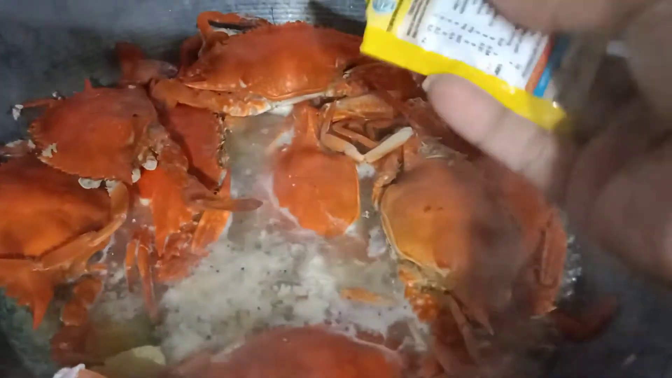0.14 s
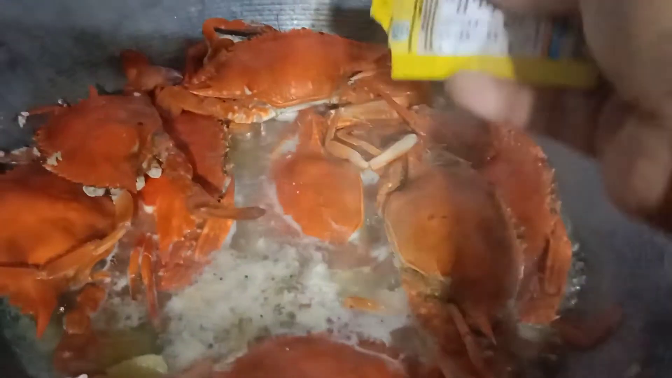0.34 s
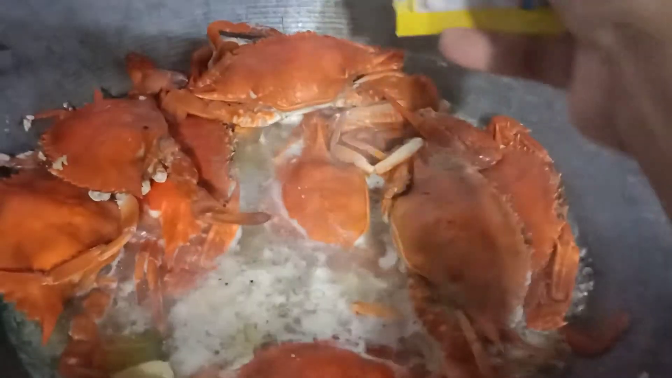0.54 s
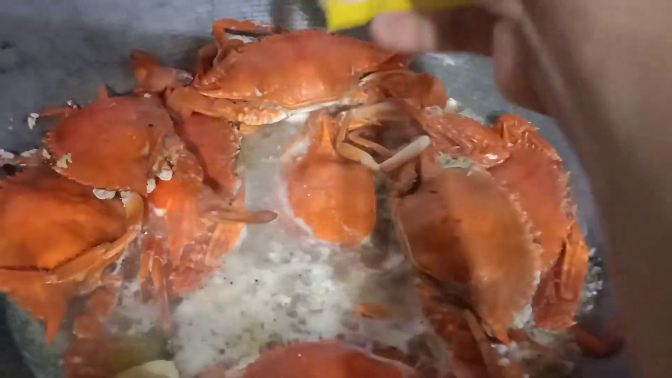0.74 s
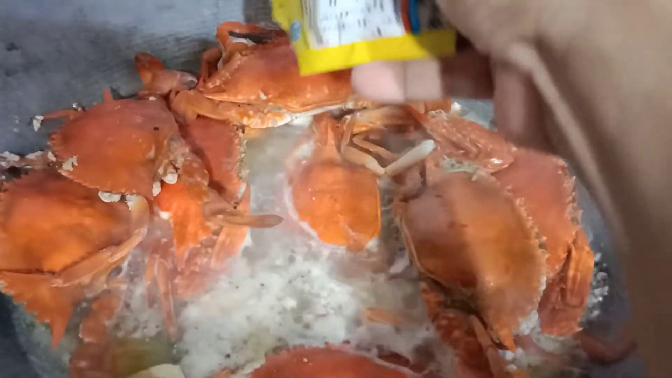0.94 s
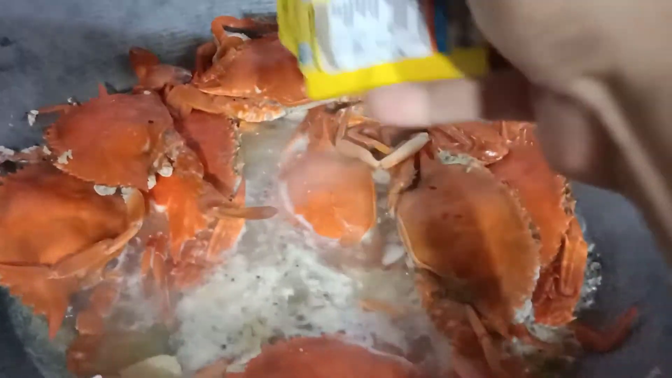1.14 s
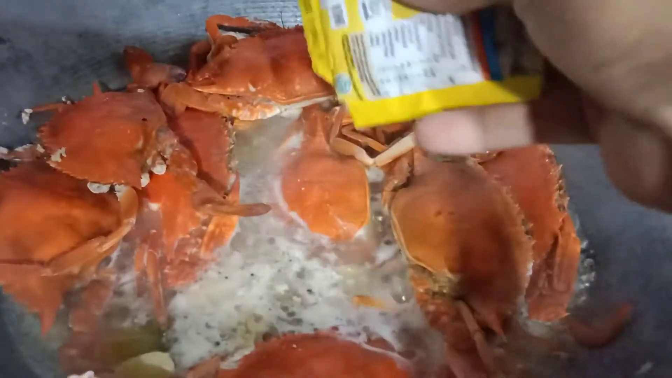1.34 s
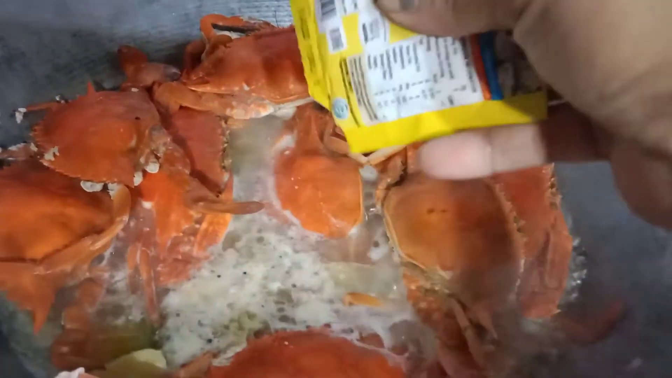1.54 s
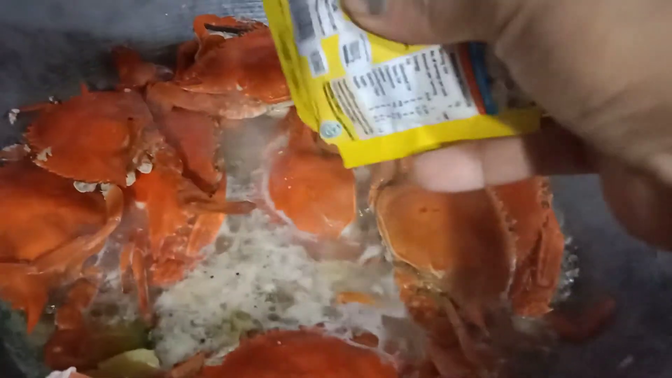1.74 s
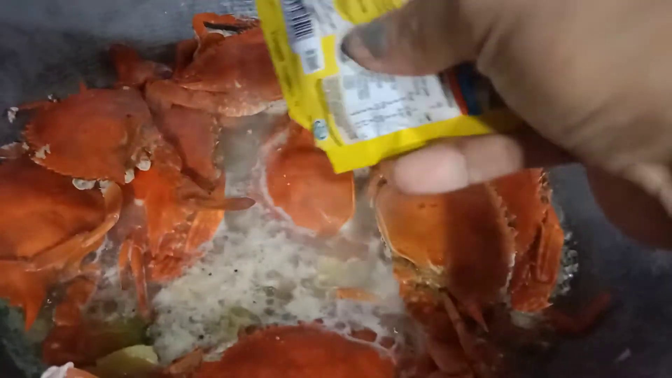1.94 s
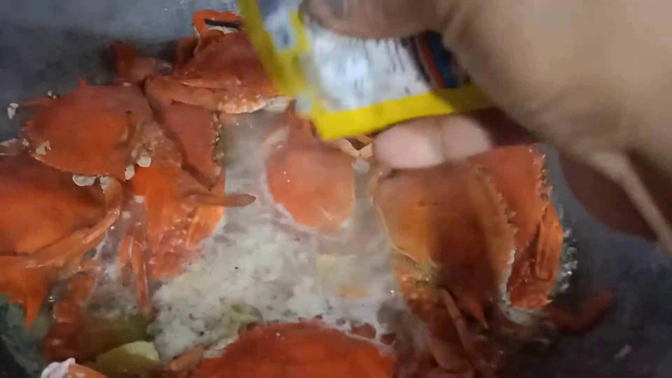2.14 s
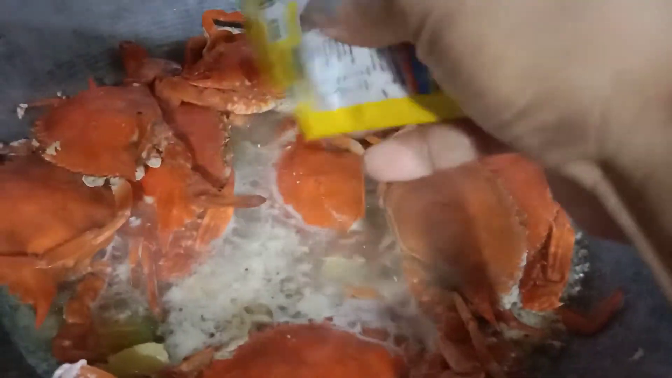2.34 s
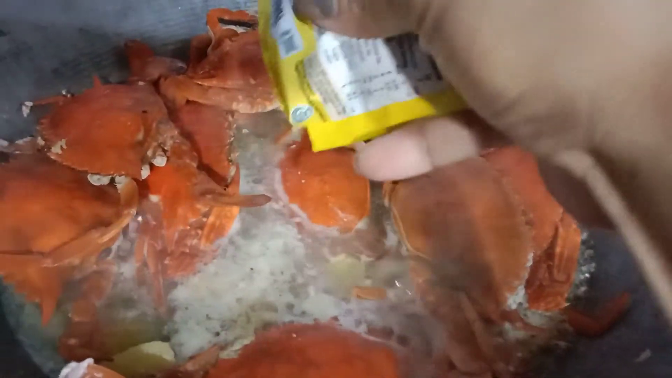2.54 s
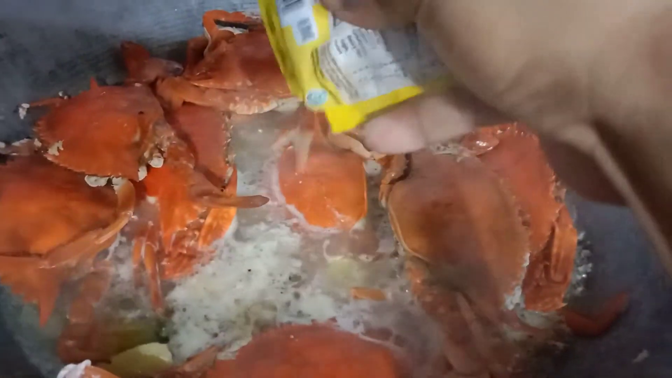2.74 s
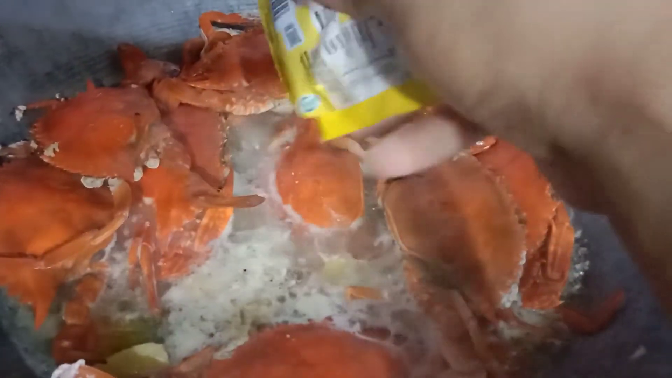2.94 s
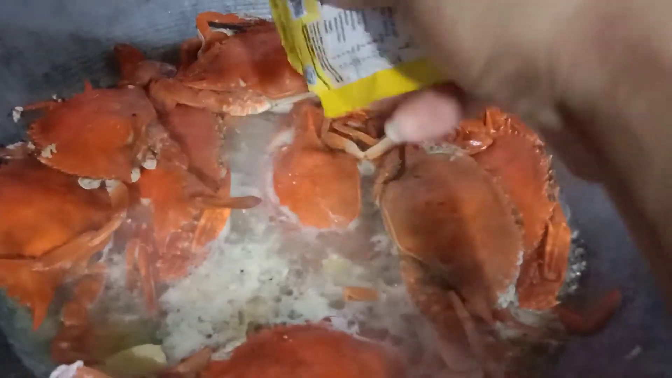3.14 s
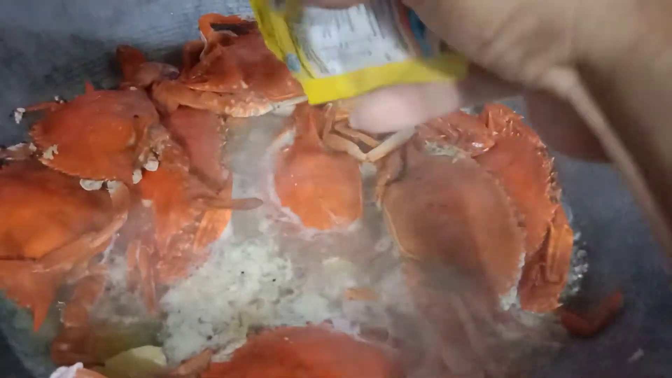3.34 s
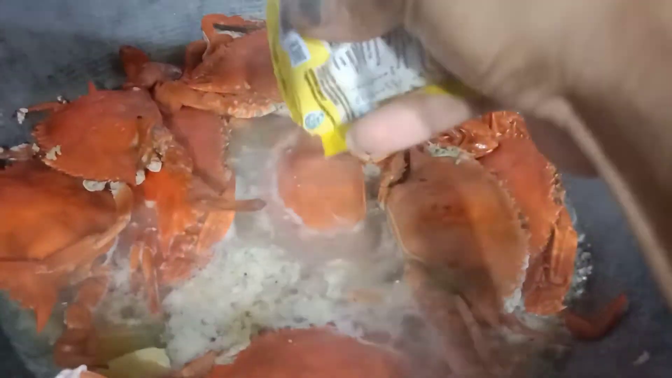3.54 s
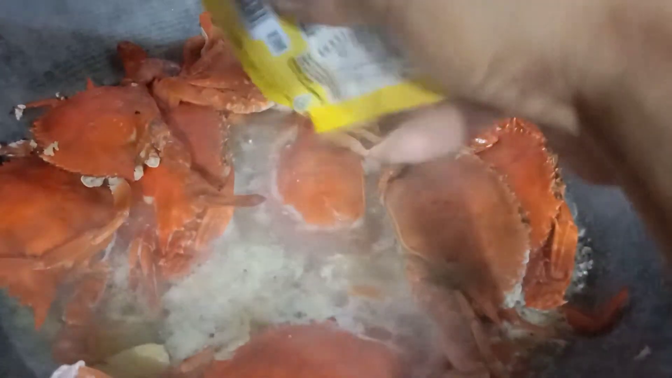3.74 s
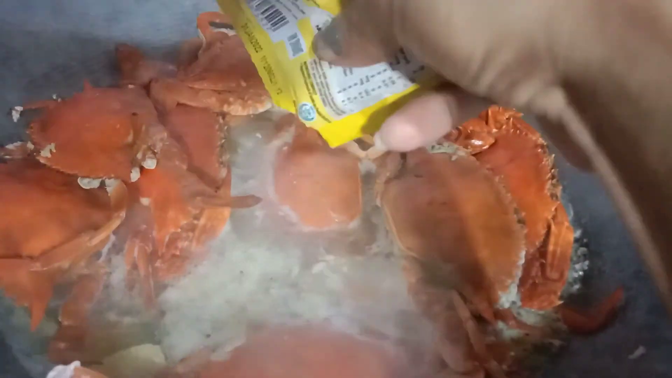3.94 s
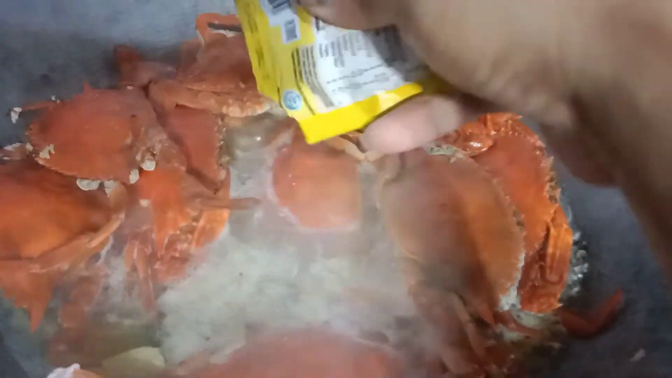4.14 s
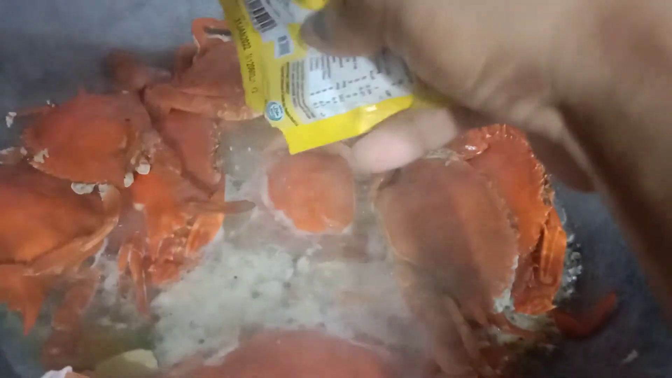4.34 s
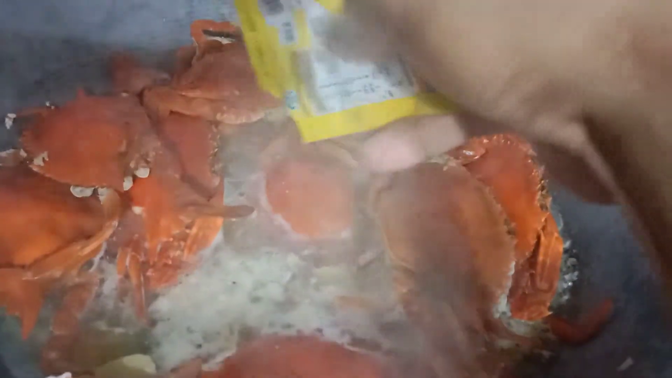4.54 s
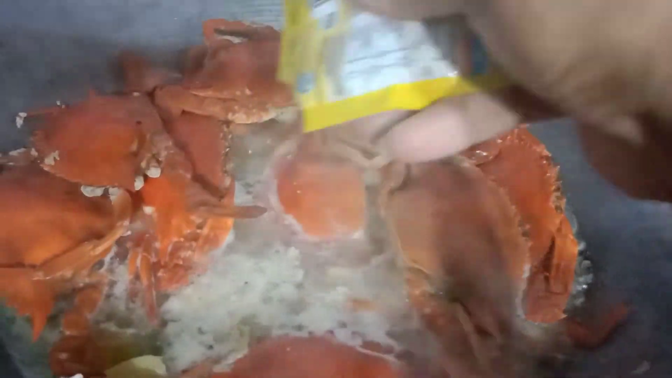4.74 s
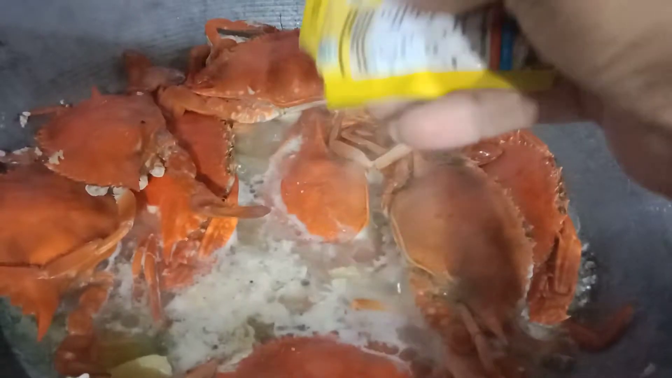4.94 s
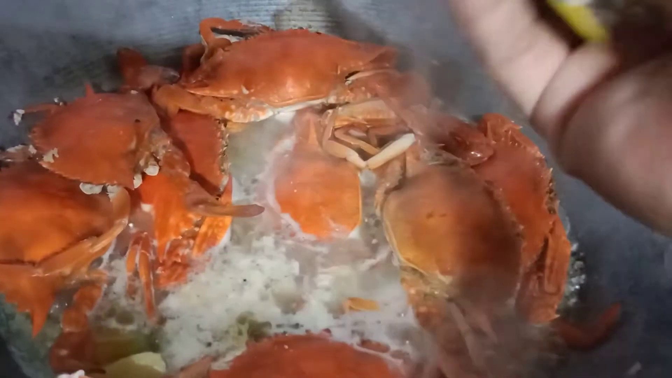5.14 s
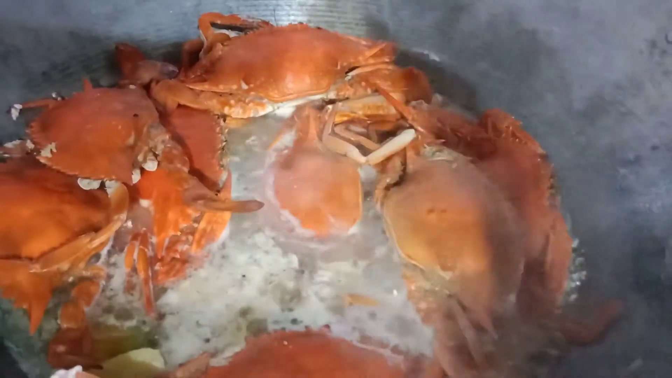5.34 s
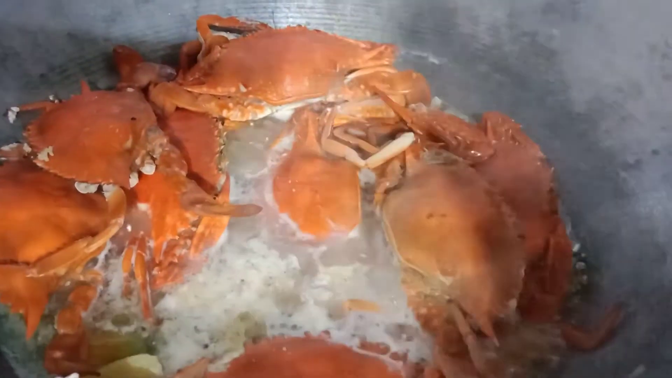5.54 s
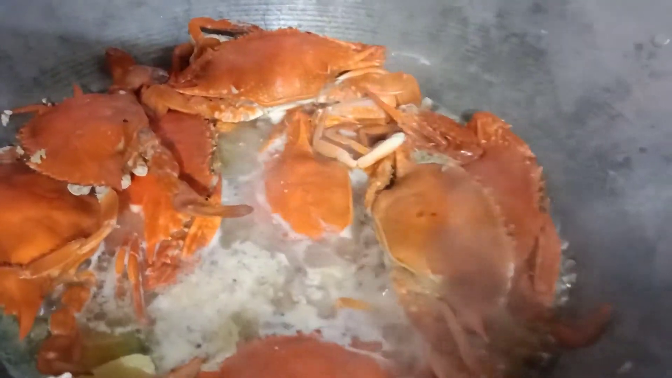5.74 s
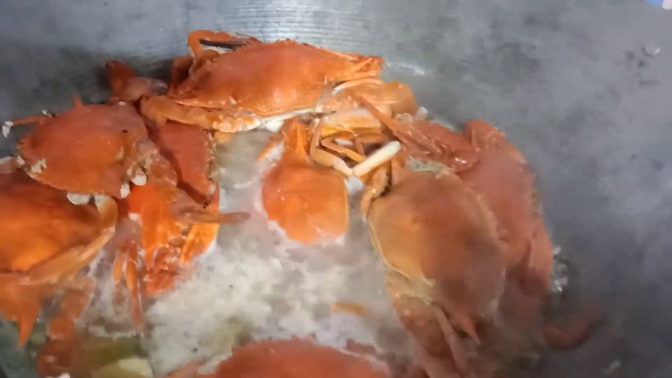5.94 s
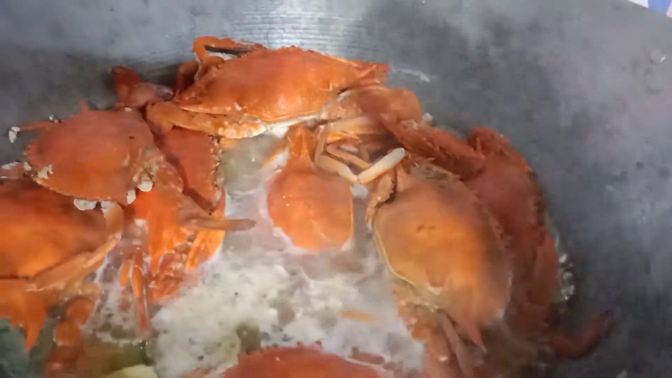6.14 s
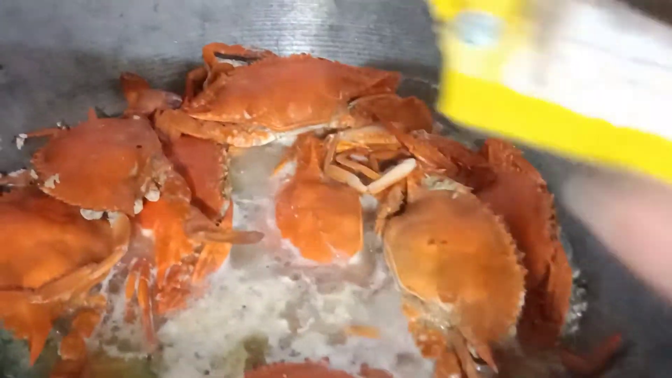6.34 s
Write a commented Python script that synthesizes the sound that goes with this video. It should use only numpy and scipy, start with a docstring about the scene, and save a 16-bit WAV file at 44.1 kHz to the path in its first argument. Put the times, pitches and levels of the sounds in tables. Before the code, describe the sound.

In a kitchen, broth bubbles and sizzles quietly in a wok, with occasional small plops, a wavering burner hum and a very faint high steam whistle. Close up and much louder, a thin plastic sachet is shaken and squeezed, crackling in uneven clusters of bright snaps. Near the end the handling stops, apart from one short crinkle, leaving the gentle simmer.

```python
"""A small plastic sachet rustles over a simmering wok as a hand squeezes and shakes it.
Broth bubbles ring the wok and burst singly over burner hum, sizzle and a faint steam whistle.
The film buckles in snaps, short clusters of creases; the kitchen rings on briefly.
The recorder suppresses noise, so hum and low bubbling come and go; it shuts its treble when quiet."""
import sys
import numpy as np
from scipy import signal
from scipy.fft import rfft, irfft
from scipy.io import wavfile
from scipy.ndimage import uniform_filter1d

SR = 44100
rng = np.random.default_rng(int(sys.argv[2]) if len(sys.argv) > 2 else 0)


def persist_wave(psi):
    """Save psi, clipped to +-1, as 16-bit WAV."""
    counts = np.round(np.clip(psi, -1, 1) * 32767).astype(np.int16)
    wavfile.write(sys.argv[1], SR, np.atleast_2d(counts).T)


N = 286650


def from_db(db):
    return 10 ** (np.asarray(db) / 20)


def unit_rms(x):
    return x / np.sqrt(np.mean(x ** 2) + 1e-20)


def per_sample(curve):
    """Rows of (t/s, value), interpolated to N samples."""
    return np.interp(np.arange(N) / SR, *np.transpose(curve))


def at_hz(curve, hz):
    """Rows of (f/Hz, value), read on a log-frequency axis."""
    knots_hz, values = np.transpose(curve)
    return np.interp(np.log(np.maximum(hz, 1)), np.log(knots_hz), values)


def bandpass(x, low_hz, high_hz):
    return signal.sosfilt(signal.butter(2, [low_hz, high_hz], "band", fs=SR, output="sos"), x)


def lowpass(x, hz):
    """Zero phase, so differences give bands that sum without gaps."""
    return signal.sosfiltfilt(signal.butter(2, hz, fs=SR, output="sos"), x)


def drift(rate_hz):
    """Slow random curve; rms 1."""
    hop, settle = 40, 2000
    pole = np.exp(-2 * np.pi * rate_hz * hop / SR)
    noise = rng.standard_normal(N // hop + settle + 2)
    slow = signal.lfilter([1], [1, -2 * pole, pole * pole], noise)[settle:]
    return np.interp(np.arange(N) / hop, np.arange(len(slow)), unit_rms(slow))


def coloured(x, spectrum, size=4096):
    """Minimum-phase filter from rows of (f/Hz, level/dB); white noise keeps its rms."""
    gain = from_db(at_hz(spectrum, np.fft.rfftfreq(size, 1 / SR)))
    cepstrum = irfft(np.log(gain))
    cepstrum[1:size // 2] *= 2
    cepstrum[size // 2 + 1:] = 0
    response = irfft(np.exp(rfft(cepstrum)))
    return signal.fftconvolve(x, response / np.sqrt(np.sum(response ** 2)))[:N]


def clicks(per_s, spread_db):
    """Random impulses of uneven size; rms 1."""
    sizes = from_db(spread_db * np.minimum(rng.exponential(1, N), 4)) * rng.choice([-1, 1], N)
    return unit_rms(sizes * (rng.random(N) < per_s / SR))


def resonate(x, hz, width_hz):
    """Two-pole resonance; rms 1."""
    r = np.exp(-np.pi * width_hz / SR)
    return unit_rms(signal.lfilter([1, 0, -1], [1, -2 * r * np.cos(2 * np.pi * hz / SR), r * r], x))


def squeeze_db():
    """Rustle level: each squeeze of the hand rises, holds and relaxes; the strongest counts."""
    # squeezes: t/s, hold/s, level/dB
    squeezes = [(-.03, 0.029, -47.5), (.21, 0.024, -61.5), (.39, .05, -55.5), (.53, 0.049, -60.5),
                (.61, 0.074, -48), (.75, 0.07, -47), (1.0, 0.1, -58), (1.19, 0.2, -52), (1.45, 0.12, -54.5),
                (1.56, 0.26, -55), (1.85, 0.028, -51.5), (1.93, 0.45, -50), (2.34, 0.21, -44),
                (2.7, 0.36, -49.5), (3.09, 0.13, -50), (3.241, 0.047, -45.5), (3.39, 0.17, -44.5),
                (3.7, 0.44, -49), (4.11, 0.094, -50.5), (4.28, .06, -57), (4.38, 0.01, -50.5),
                (4.49, 0.021, -44.5), (4.66, 0.077, -46), (4.85, 0.078, -44.5), (5.04, 0.11, -52.5),
                (5.85, 0.02, -52), (5.99, 0.071, -54.5), (6.46, .1, -58.5)]
    grip_db_per_s, relax_db_per_s = 499.5, 201
    t = np.arange(0, N + 40, 40) / SR
    start_s, hold_s, held_db = np.transpose(squeezes)[..., None]
    grip_db = grip_db_per_s * np.maximum(start_s - t, 0)
    relax_db = relax_db_per_s * np.maximum(t - start_s - hold_s, 0)
    return np.interp(np.arange(N) / SR, t, (held_db - grip_db - relax_db).max(axis=0))


def rustle(level_db):
    """Tiny creases buckle in clumps; air pockets pop hollowly."""
    clumps = from_db(3.5 * drift(rate_hz=35))
    creases = lowpass(clicks(per_s=3000, spread_db=0), hz=10000)
    thin = unit_rms(clumps * (creases - 0.5 * lowpass(creases, hz=1400)))  # small creases: little bass
    pockets = sum(resonate(clicks(per_s=6, spread_db=2), hz, width_hz=0.07 * hz)
                  for hz in np.geomspace(280, 1500, 9))
    return from_db(level_db) * (thin + from_db(-5) * unit_rms(pockets))


def small_snap_rows(rustle_db, count=600):
    """Rows for film_snaps: lesser snaps at random times, following the rustle level."""
    rate_per_s, above_rustle_db, body_db = 55, 17, -14.5
    wait, weakness, edge = rng.random((count, 3)).T
    times_s = np.cumsum(-np.log(1 - wait)) / rate_per_s
    levels_db = np.interp(times_s, np.arange(N) / SR, rustle_db) + above_rustle_db - 11 * weakness
    return [(start_s, level_db, body_db, bright_db)
            for start_s, level_db, bright_db in zip(times_s, levels_db, 12 * (edge - 0.5))
            if start_s < N / SR]


def burner_hum():
    """Low burner hum, heard in surges; the envelope stands for the noise suppressor opening and closing."""
    # hum envelope: t/s, level/dB
    envelope = [(0.0, -81), (0.05, -72), (0.61, -82.5), (0.65, -64), (1.92, -77), (1.96, -67),
                (2.23, -54.5), (2.3, -80), (2.46, -57), (2.77, -80.5), (2.9, -59.5), (3.13, -89.5),
                (3.24, -59), (3.76, -78), (4.0, -59.5), (4.04, -77), (4.56, -68), (5.76, -78.5),
                (5.88, -62.5), (5.97, -83), (6.35, -70), (6.5, -92)]
    hum_hz, width_hz = 122, 29
    rumble = resonate(rng.standard_normal(N), hum_hz, width_hz)
    return from_db(per_sample(envelope)) * (resonate(rumble, hum_hz, width_hz) + 0.35 * rumble)


def bubbling():
    """Broth rings two wok resonances; the low one comes and goes as the suppressor lets it through."""
    # low bubbling as let through: t/s, level/dB
    envelope = [(0.0, -64), (0.23, -79.5), (0.87, -52), (1.48, -75), (1.65, -52), (1.74, -75.5),
                (2.08, -91), (2.19, -53.5), (3.44, -75), (3.49, -48), (3.58, -85), (3.96, -52.5),
                (3.98, -69.5), (5.1, -59), (5.59, -73), (5.74, -68), (5.97, -78.5), (6.5, -67)]
    low_hz, low_width_hz = 527, 32
    heard_db = per_sample(envelope)
    low_db = heard_db + 5.5 * drift(rate_hz=3.4)
    low_ring = resonate(clicks(per_s=890, spread_db=0.5), low_hz, low_width_hz)
    low_ring = resonate(low_ring, low_hz, low_width_hz)
    high_db = -58 + 0.55 * (heard_db - heard_db.mean()) + 2.5 * drift(rate_hz=3.3)
    high_ring = resonate(clicks(per_s=2200, spread_db=-1.5), hz=1400, width_hz=110)
    return from_db(low_db) * low_ring + from_db(high_db) * high_ring


def sizzle(level_db=-59):
    """Dense clicks from the wok; low bands come and go, the high hiss is steadier."""
    # sizzle spectrum: f/Hz, density/dB
    spectrum = [(29, -70.5), (50, -31), (122, -13), (468, -20), (524, -17), (701, -23), (838, -20),
                (1640, -24), (2010, -21.5), (2930, -15), (4390, -30.5), (6140, -11.5), (7050, -28.5),
                (7700, -16), (9300, -17), (10500, -25), (13600, -65), (22000, -120)]
    crackle = coloured(clicks(per_s=8000, spread_db=2.5), spectrum)
    edges_hz = np.geomspace(40, 14000, 15)
    common_db = 3.5 * drift(rate_hz=44)
    patches = np.zeros(N)
    for low_hz, high_hz in zip(edges_hz, edges_hz[1:]):
        swing_db = (common_db + 1.83 * drift(rate_hz=7)) / (1 + low_hz / 3000)
        patches += bandpass(crackle, low_hz, high_hz) * from_db(swing_db)
    return from_db(level_db) * unit_rms(patches)


def steam_whistle():
    """Steam sounds a faint, narrow noise band of wavering level."""
    level_db = -65 + 3 * drift(rate_hz=2.8)
    return from_db(level_db) * resonate(rng.standard_normal(N), hz=6160, width_hz=120)


def plops():
    """A bursting bubble swells within a few cycles and rings down, rising slightly in pitch."""
    # single bubbles: t/s, level/dB, f/Hz, t60/s
    bubbles = [(0.079, -41.5, 1780, 0.028), (0.341, -32.5, 1400, 0.031), (0.489, -52.5, 497, 0.085),
               (0.76, -50, 1390, 0.067), (0.841, -39.5, 533, 0.049), (0.959, -31, 236, 0.028),
               (1.28, -30, 832, 0.027), (1.649, -43, 1455, 0.14), (2.076, -31, 750, 0.035),
               (2.169, -28.5, 735, 0.036), (2.239, -38.5, 535, 0.036), (2.44, -30.5, 1450, 0.071),
               (2.688, -51, 1400, 0.034), (3.105, -23.5, 1293, 0.021), (3.487, -32.5, 1296, 0.044),
               (3.958, -24.5, 1320, 0.049), (4.369, -29.5, 1396, 0.033), (4.51, -21.5, 1373, 0.019),
               (5.069, -37, 850, 0.08), (5.377, -49, 1420, 0.085), (5.499, -51, 866, 0.05),
               (5.584, -35.5, 1692, 0.024), (5.743, -46.5, 520, 0.07), (6.313, -46, 1360, 0.068),
               (6.465, -46, 937, 0.063)]
    t = np.arange(8000) / SR
    out = np.zeros(N + len(t))
    for start_s, level_db, hz, t60_s in bubbles:
        ring = np.sin(2 * np.pi * hz * (t + 0.71 * t ** 2))
        attack = 1 - np.exp(-t * hz / 1.2)
        out[round(start_s * SR):][:len(t)] += from_db(level_db - 60 * t / t60_s) * attack * ring
    return out[:N]


def film_snaps(small_rows):
    """Each snap is a cluster of creases buckling within a few ms, with its own body and brightness."""
    # distinct snaps: t/s, level/dB, body below 2.2 kHz re level/dB, brightness/dB
    snap_rows = [(0.3922, -23.5, -20.5, -3), (0.5463, -35.5, -19, -6), (0.601, -32, -18, -9),
                 (0.623, -29, -21, -6), (0.642, -22.5, -15, 8), (0.6553, -20, -30, -9.5),
                 (0.7392, -10.5, -8, -0.5), (0.825, -16.5, 1.5, -3), (0.842, -16.5, -6.5, -2),
                 (0.8992, -17.5, -7, -1), (0.92, -14, -12, -3.5), (0.9905, -25.5, -32, -11),
                 (1.017, -10.5, -10, -3.5), (1.077, -29.5, -23, -8), (1.1647, -18, -12, 0),
                 (1.2357, -20, -12, -4), (1.2674, -24, 9, 7), (1.2823, -15, -8, -3),
                 (1.332, -21.5, -14.5, -4), (1.3563, -30.5, -2.5, -6.5), (1.385, -32, -9.5, 1.5),
                 (1.4894, -34, -7, -4), (1.5642, -22.5, -10, 2.5), (1.5737, -21, -10, 3.5),
                 (1.6345, -34, -20, 0), (1.6517, -21, -13, 1), (1.6646, -16.5, 4, -1.5),
                 (1.6843, -24.5, -6, 11), (1.6971, -22, -7, -14), (1.7556, -11.5, -6, -3),
                 (1.917, -14.5, -5.5, 0.5), (1.9353, -12.5, -9.5, -0.5), (1.9565, -25, -18, -5),
                 (1.9641, -11, -3, -0.5), (2.0283, -17.5, -35, 6), (2.0778, -18.5, -17, 0),
                 (2.1254, -38, -15, -17), (2.1354, -13.5, -41, -3.5), (2.1711, -16.5, -18.5, -3.5),
                 (2.225, -20.5, 3, -2.5), (2.2444, -30.5, -18, -0.5), (2.267, -26.5, -9, 5),
                 (2.3367, -14.5, -15, -2), (2.357, -19, -15, -2), (2.367, -16, -16, -1.5),
                 (2.4064, -15.5, 6.5, -0.5), (2.4221, -11.5, -9.5, -5.5), (2.4338, -15.5, -7, -3),
                 (2.4626, -9.5, -9.5, -1.5), (2.4917, -15, -4, -6.5), (2.5063, -5, -11.5, 6.5),
                 (2.5127, -8, -1, -2.5), (2.547, -17, -19, -2), (2.598, -15.5, -14, 3),
                 (2.6694, -20.5, -25, 0), (2.6762, -11, -5, 7.5), (2.6921, -2.5, -13, 2.5),
                 (2.7939, -22.5, -29, 0), (2.807, -19.5, -12, -8), (2.864, -21, -27.5, -5.5),
                 (2.8939, -12, -26, 13), (2.9308, -10, -23.5, 9), (2.9488, -11.5, -24.5, -2.5),
                 (3.0088, -10.5, -13.5, 3.5), (3.0757, -11, -13.5, 5.5), (3.1087, -9.5, -16, -2),
                 (3.1607, -26, -24, 3), (3.1884, -28, -15, -2), (3.2156, -29, -15, -2),
                 (3.238, -28.5, -15, -2), (3.248, -14.5, -24, 1), (3.2597, -13, -13, 3),
                 (3.2814, -16.5, -9, 4), (3.3702, -24, 1.5, -2), (3.3922, -12.5, -34, 4),
                 (3.4301, -14, -4.5, -6.5), (3.446, -17.5, -14, -9.5), (3.463, -12, -1, 7.5),
                 (3.5249, -5.5, -13.5, 6), (3.5947, -15, -15, 1.5), (3.677, -28.5, -11.5, 3.5),
                 (3.7005, -22, -51, -1.5), (3.7274, -11.5, -20.5, 0), (3.7382, -17.5, -18, -1),
                 (3.7563, -18, -17.5, -6), (3.7774, -10.5, -10.5, -4), (3.7858, -7, -11, 3.5),
                 (3.802, -5.5, -16, 2), (3.8414, -14.5, -29, 3), (3.8548, -7.5, -26, 2.5),
                 (3.8902, -13, -11, -1), (3.902, -7, -10, 6.5), (3.9464, -9, -6, 4), (3.9593, -1, -7.5, 2),
                 (3.9834, -13, -15, 1), (3.9944, -12, -15, -1.5), (4.0355, -8.5, -9.5, 0.5),
                 (4.094, -28, -23.5, -4), (4.1024, -11, -12, 3), (4.1061, -5.5, -15.5, 0),
                 (4.2915, -27.5, -11, 2.5), (4.3731, -21.5, -3, -3), (4.393, -28.5, -20, -0.5),
                 (4.472, -20, -13, -5), (4.4901, -15, -4, 1), (4.558, -34, -13.5, 2.5),
                 (4.637, -32, -6.5, 1), (4.663, -16.5, -20.5, -7), (4.6845, -17, -26, 5),
                 (4.722, -27, -13, 6), (4.7526, -18.5, -3, 5), (4.8224, -23, -27, 2),
                 (4.8461, -6.5, -7.5, 3.5), (4.9418, -25.5, 1, -10.5), (4.9658, -22, -0.5, 6),
                 (5.0197, -21.5, -18, -3.5), (5.0387, -17.5, -2, -1), (5.0559, -7.5, -0.5, 4),
                 (5.2938, -36, -18, 0), (5.8505, -27, -2.5, -8), (5.9732, -23.5, -23.5, -9.5),
                 (5.9797, -14, -28, 1), (6.013, -26.5, -20, 1)]
    attack_s, cluster_t60_s, edge_t60_s = 0.0016, 0.02, 0.014
    t = np.arange(4000) / SR
    body, lower, middle, edge = np.zeros((4, N + len(t)))  # band envelopes
    for start_s, level_db, body_db, bright_db in snap_rows + small_rows:
        span = slice(round(start_s * SR), round(start_s * SR) + len(t))
        onset = from_db(level_db) * (1 - np.exp(-t / attack_s))
        cluster = onset * from_db(-60 * t / cluster_t60_s)
        bright = from_db(np.clip(bright_db, -14, 14))
        body[span] += cluster * from_db(body_db)
        lower[span] += cluster / bright  # a tight crease trades lower ring for edge
        middle[span] += cluster
        edge[span] += onset * bright * from_db(-60 * t / edge_t60_s)
    creases = clicks(per_s=9000, spread_db=0.5)
    low, mid, high = (lowpass(creases, hz) for hz in (2200, 4200, 9000))
    return (body[:N] * low + lower[:N] * (mid - low)
            + middle[:N] * (high - mid) + edge[:N] * (creases - high))


def kitchen_echo(x, level_db=-3, positions=4):
    """Diffuse echoes die band by band; cycling through several tails stands for the moving hand."""
    # room decay: f/Hz, t60/s
    decay = [(300, 0.36), (2000, 0.22), (6000, 0.17), (10000, 0.1), (15000, 0.25)]
    t = np.arange(SR // 2) / SR
    edges_hz = np.geomspace(150, 19000, 9)
    position = np.arange(N) // 3000 % positions
    out = np.zeros(N)
    for k in range(positions):
        tail = np.zeros(len(t))
        for low_hz, high_hz in zip(edges_hz, edges_hz[1:]):
            t60_s = at_hz(decay, np.sqrt(low_hz * high_hz))
            tail += bandpass(rng.standard_normal(len(t)), low_hz, high_hz) * from_db(-60 * t / t60_s)
        tail *= 1 - np.exp(-t / 0.00067)
        out += signal.fftconvolve(x * (position == k), tail / np.sqrt(np.sum(tail ** 2)))[:N]
    return from_db(level_db) * out


def suppress_noise(x, over_db, depth_db):
    """Each frequency is turned down when near its own quiet level."""
    frames = signal.stft(x, nperseg=512)[2]
    power = uniform_filter1d(np.abs(frames) ** 2, size=5, axis=-1)
    power = uniform_filter1d(power, size=3, axis=-2)
    quiet = np.percentile(power, 20, axis=-1, keepdims=True)
    gain = np.maximum(1 - from_db(over_db) * quiet / (power + 1e-20), from_db(depth_db))
    return signal.istft(frames * gain, nperseg=512)[1][..., :N]


def gate_treble(x, split_hz, threshold_db, floor_db):
    """Soft gate on what a steep low-pass removes: treble passes only while strong enough."""
    low = signal.sosfiltfilt(signal.cheby2(16, 40, split_hz, fs=SR, output="sos"), x)
    treble = x - low
    level_db = 10 * np.log10(uniform_filter1d(treble ** 2, size=1500) + 1e-14)
    opening = 1 / (1 + np.exp(-np.clip((level_db - threshold_db) / 2, -30, 30)))
    return low + treble * (opening + from_db(floor_db))


def scene():
    """Sachet and plops with kitchen echo, over the simmering wok; mono."""
    # sachet spectrum at the microphone: f/Hz, density/dB
    film_spectrum = [(180, -32), (300, -19), (472, -27.5), (522, -13), (986, -14), (1360, -6.5),
                     (2400, -13.5), (3080, -3), (4240, -12), (5830, -0.5), (11200, -20), (14900, -16.5),
                     (16500, -19.5)]
    rustle_db = squeeze_db()
    film = film_snaps(small_snap_rows(rustle_db)) + rustle(rustle_db)
    near = coloured(film, film_spectrum) + plops()
    return (near + kitchen_echo(near) + burner_hum() + bubbling() + sizzle() + steam_whistle())[None]


def record(dry):
    """Recorder: noise suppressor, treble gate, faint electronic hiss, steep low-pass."""
    hiss_db, cutoff_hz = -86, 16050
    cleaned = suppress_noise(dry, over_db=2.5, depth_db=-7.5)
    gated = gate_treble(cleaned, split_hz=10900, threshold_db=-75.5, floor_db=-31)
    hiss = from_db(hiss_db) * rng.standard_normal(N)
    return signal.sosfilt(signal.cheby2(14, 60, cutoff_hz, fs=SR, output="sos"), gated + hiss)


dry = scene()
out = record(dry)
persist_wave(out)
```